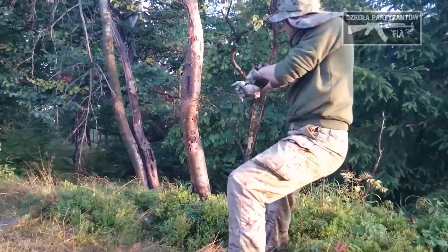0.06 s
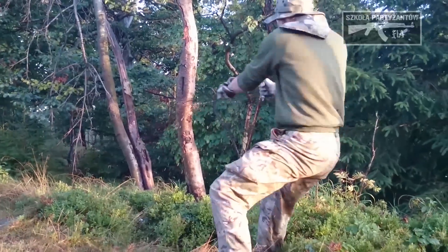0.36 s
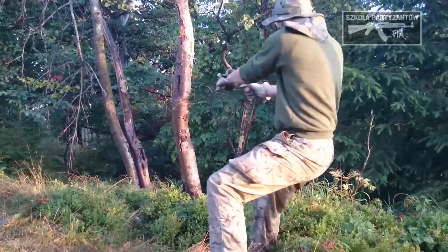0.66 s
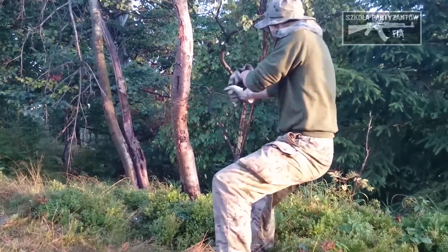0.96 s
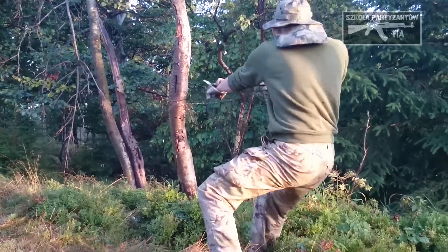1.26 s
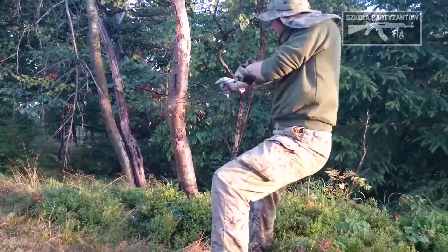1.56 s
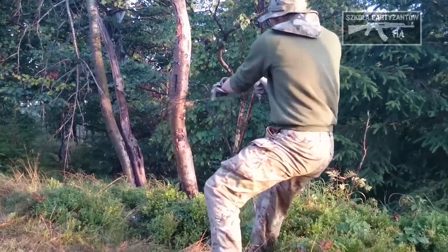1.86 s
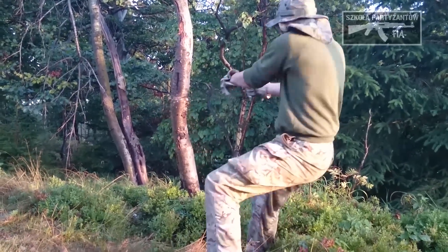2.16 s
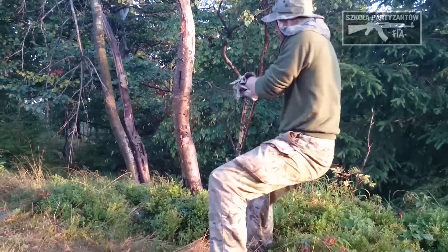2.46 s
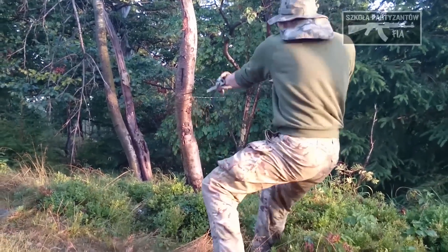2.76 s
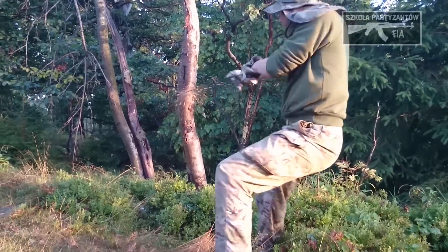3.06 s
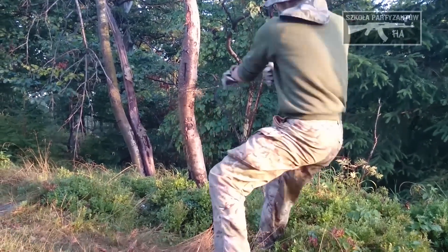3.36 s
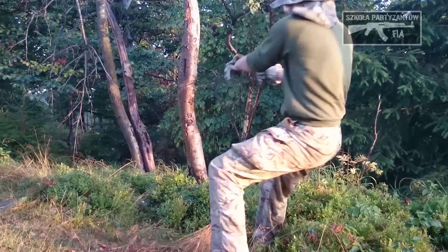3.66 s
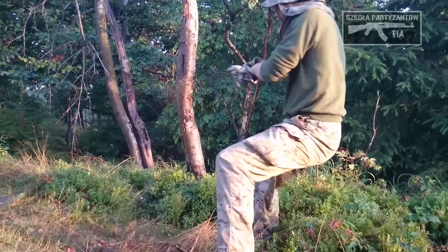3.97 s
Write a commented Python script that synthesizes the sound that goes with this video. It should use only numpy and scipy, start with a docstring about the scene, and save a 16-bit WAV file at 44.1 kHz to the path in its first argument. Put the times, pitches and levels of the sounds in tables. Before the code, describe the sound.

Steady hand sawing through wood outdoors, loud pulls alternating with lighter strokes.

```python
"""A hand saw is worked back and forth through a standing trunk at the edge of a forest.
On each loud pull and lighter push, tooth impacts and stick-slip friction excite the resonances of
trunk and blade; single teeth snag with a tick and a knock, and the trees scatter back a dull tail.
Wind buffets the microphone, mostly in the first half, over a faint forest hush."""
import sys
import numpy as np
from scipy import signal
from scipy.fft import rfft, irfft
from scipy.io import wavfile

SR = 44100
rng = np.random.default_rng(int(sys.argv[2]) if len(sys.argv) > 2 else 0)


def wav_out(sig):
    """Save sig, one row per channel (or a flat mono array), as 16-bit PCM at SR to the path in sys.argv[1]."""
    wavfile.write(sys.argv[1], SR, np.round(np.clip(np.atleast_2d(sig).T, -1, 1) * 32767).astype(np.int16))


N = 176400

# Pulls and pushes in turn; the levels in all tables are relative: (start [s], length [s], peak [dB],
# place of the peak [0-1], swell from ends to peak [dB], wood body [dB], hollow note [dB])
SAW_STROKES = [(-.165, 0.35, -34, 0.53, 34, -1, -14), (0.229, 0.27, -41.5, 0.47, 12.5, 1, 6),
               (0.565, 0.34, -36.5, 0.55, 20, 0.5, 4.5), (0.977, 0.25, -44, 0.42, 9.5, 1.5, 6),
               (1.336, 0.31, -36.5, 0.42, 18.5, -1, 1), (1.729, 0.32, -44.5, 0.28, 9, -1, 2.5),
               (2.061, 0.33, -38.5, 0.49, 14, 2, 5), (2.463, 0.27, -43, 0.27, 8.5, -5, -1.5),
               (2.836, 0.33, -37, 0.56, 18, -1.5, -0.5), (3.206, 0.28, -43.5, 0.41, 11.5, -4.5, 3),
               (3.576, 0.35, -38, 0.39, 16, -2.5, 4), (3.925, 0.35, -45, 0.74, 14.5, 0, -3)]
# Teeth that catch: (time [s], steel tick [dB], knock in the wood [dB])
TOOTH_SNAGS = [(0.0054, -48, -35), (0.02, -45, -39), (0.0336, -30, -51), (0.045, -52, -38),
               (0.2466, -47, -48), (0.2878, -30, -46), (0.3122, -34, -45), (0.3331, -29, -62),
               (0.3684, -31, -42), (0.4076, -29, -50), (0.463, -40, -49), (0.5736, -51, -57),
               (0.7346, -49.5, -34), (0.87, -45, -54), (0.9844, -56, -53.5), (1.0899, -35.5, -53),
               (1.1343, -30.5, -62), (1.1816, -32, -65), (1.3444, -51, -54), (1.364, -40, -43),
               (1.483, -38, -43), (1.5104, -51, -37), (1.7627, -42, -50), (1.802, -44, -48),
               (1.942, -34, -64), (2.0759, -37.5, -59), (2.1179, -32.5, -45), (2.149, -24, -33),
               (2.1794, -37, -41), (2.2423, -56.5, -37), (2.373, -56, -46), (2.4706, -26.5, -47),
               (2.5067, -30.5, -52), (2.5529, -32.5, -65), (2.5909, -27.5, -48), (2.6756, -33, -56),
               (2.7059, -38, -69), (2.8433, -53, -48), (2.998, -35, -36.5), (3.011, -39, -37),
               (3.0502, -34, -33.5), (3.1271, -34, -39), (3.2202, -40, -49), (3.3077, -32.5, -60),
               (3.3478, -33, -42), (3.4431, -41, -50), (3.4972, -46, -70), (3.5842, -39.5, -42.5),
               (3.6127, -51, -35), (3.633, -44, -44), (3.6904, -40, -38.5), (3.7108, -45, -39),
               (3.7927, -40, -35.5), (3.815, -40, -40), (3.862, -34.5, -38)]
# Resonances of trunk and blade: (frequency [Hz], width [Hz], lift [dB])
RESONANCES = [(437, 41, 6.5), (512.5, 23, 7.5), (660, 17, 4.5), (930, 62, 8), (1313, 37, 4),
              (1794, 31, 2.5), (1955, 110, 3.5), (2170, 79, 2), (2266, 78, 1), (2655, 54, 6),
              (2901, 102, 7.5), (3497, 85, 2), (3980, 73, 6.5), (6180, 350, 6.5), (6790, 170, 3)]
# Spectra of wood body, cut, steel, snags, wind and forest: (frequency [Hz], level [dB])
BODY_SPECTRUM = [(100, -39), (230, -15.5), (350, -0.5), (520, 3), (650, -8), (950, -13), (1300, -20),
                 (2500, -30), (8000, -60)]
RASP_SPECTRUM = [(200, -30.5), (550, -12), (1000, -1), (1400, -5.5), (1650, -5), (2100, -1), (2900, -2),
                 (3400, -6.5), (4500, -11.5), (6300, -11.5), (9000, -20), (16000, -31)]
HISS_SPECTRUM = [(500, -29), (2500, 0.5), (4500, -0.5), (6500, 2), (8500, -0.5), (12500, -3), (14000, -4),
                 (15500, 3), (17000, 2.5)]
TICK_SPECTRUM = [(500, 10), (3000, -22), (6300, -1), (9000, -3.5), (13000, -4), (15500, 2), (17000, -1.5)]
KNOCK_SPECTRUM = [(150, -18), (400, -6), (650, 2.5), (1100, -19), (1550, -10.5), (1950, 1.5), (3000, 3),
                  (4500, -9.5), (6500, -12), (12000, -33)]
WIND_SPECTRUM = [(10, -14), (30, -27), (45, -5.5), (60, 2), (90, -3), (130, -11.5), (200, -20),
                 (350, -35.5), (1000, -56)]
HUSH_SPECTRUM = [(20, -24), (70, 6.5), (150, -13), (300, 11), (650, -2), (950, 5), (1500, -3), (3000, -5),
                 (4500, -12), (6500, -6), (10000, -19), (16000, -24)]
# Wind strength at the microphone: (time [s], level [dB])
WIND_GUSTS = [(0.0, -34), (0.02, -48), (0.08, -27.5), (0.18, -50.5), (0.34, -39), (0.39, -60),
              (0.44, -33.5), (0.5, -63), (0.54, -48.5), (0.98, -49.5), (1.02, -58.5), (1.12, -40.5),
              (1.16, -54), (1.31, -45.5), (1.38, -55.5), (1.41, -43.5), (1.53, -40.5), (1.56, -55),
              (1.94, -46), (1.97, -57), (2.07, -41), (2.12, -67), (2.14, -41), (2.33, -41.5), (2.41, -53.5),
              (2.53, -53.5), (2.68, -65.5), (3.77, -68.5), (3.82, -58.5), (4.0, -58.5)]
# Stereo widening, sound in opposite phase between left and right: (frequency [Hz], share [ratio])
ANTIPHASE_SHARE = [(100, -0.1), (270, 0.96), (380, 0.9), (500, 1.12), (640, 0.68), (900, 0.7552),
                   (1150, 0.82), (1400, 0.4246), (1900, 0.46), (2300, 0.18), (2900, 0.202), (4500, -0.0567),
                   (9000, 0.0534)]
# Part of the remainder that is delayed on the left: (frequency [Hz], share [ratio])
DELAYED_SHARE = [(1200, 0.017), (3000, 0.24), (6000, 0.5), (15000, 0.55)]
# Level difference between the channels: (frequency [Hz], left minus right [dB])
LEFT_BALANCE = [(300, -1), (650, -2.5), (1250, 1), (1400, -8), (1700, 3.5), (2050, 5.5), (2400, 2),
                (2650, 3), (3100, -0.5), (3800, 1), (4900, 1.5), (6000, -10), (7600, -1), (8500, -4.5),
                (10000, 0.5), (13000, -2), (14300, 7), (15500, 18)]

TAPS = 4096
HZ = np.fft.rfftfreq(2 * TAPS, 1 / SR)
T = np.arange(N) / SR


def amp(db):
    """Amplitude ratio of a level in decibels."""
    return 10 ** (np.asarray(db) / 20)


def unit(x):
    """Normalisation to rms 1."""
    return x / np.sqrt(np.mean(x ** 2) + 1e-20)


def curve(points):
    """Interpolation of a table on a logarithmic frequency axis."""
    hz, value = np.transpose(points)
    return np.interp(np.log(HZ + 1), np.log(np.sort(hz) + 1), value)


def colour(x, db):
    """Minimum-phase filtering by a dB curve, conserving the power of white noise."""
    cepstrum = irfft(np.log(unit(amp(db)) + 1e-6))
    cepstrum[1:TAPS] *= 2
    cepstrum[TAPS + 1:] = 0
    impulse = irfft(np.exp(rfft(cepstrum)))[None, :TAPS]
    return signal.oaconvolve(x, impulse, axes=1)[:, :x.shape[1]]


def noise():
    """Two uncorrelated white noises."""
    return rng.standard_normal((2, N))


def arm_strokes(bite_s=0.01, lift_s=0.026, full_db=-36, hollow_fade_db=8.5, body_lag_s=0.024):
    """Amplitude modulation: blade speed and the drives on cut, wood and hollow note rise and fall."""
    speed, effort, wood, hollow = np.zeros((4, N))
    for start, length, db, peak, swell_db, wood_db, hollow_db in SAW_STROKES:
        on = (T > start) & (T < start + length)
        t = T[on] - start
        arch = np.sin(np.pi * np.interp(t / length, [0, peak, 1], [0, .5, 1]))
        contact = np.clip(t / bite_s, 0, 1) * np.clip((length - t) / lift_s, 0, 1)
        force = contact * amp(db - full_db - swell_db * (1 - arch))
        speed[on] += arch
        effort[on] += force
        wood[on] += amp(wood_db) * force ** 1.38  # the wood body grows faster than the force
        hollow[on] += amp(hollow_db - hollow_fade_db * t / length) * force
    return speed, effort, np.interp(T - body_lag_s, T, wood), hollow


def tooth_impacts(speed, peak_per_s=900, slowest_share=0.34, decay_s=0.0012, spread_db=2.5):
    """Shot noise: each tooth tears a brief burst, more often at speed, over steady rubbing."""
    bites = rng.random(N) < peak_per_s * (slowest_share + (1 - slowest_share) * speed) / SR
    size = amp(spread_db * np.clip(rng.standard_normal(N), -2, 2))
    bursts = signal.lfilter([1], [1, -np.exp(-1 / (decay_s * SR))], bites * size)
    return unit(np.hypot(1, unit(bursts)))  # rubbing and bursts have equal power


def stick_slip(slips_per_s=60, decay_s=0.0032, jump=0.81):
    """Stick-slip friction: at each random slip of the blade the amplitude jumps, then relaxes."""
    last_slip = np.maximum.accumulate(np.where(rng.random(N) < slips_per_s / SR, T, -1))
    return unit(1 + jump * np.exp((last_slip - T) / decay_s))


def resonance_db():
    """Resonance: each mode of trunk and blade raises a peak in the spectrum of the cut."""
    return sum(db / (1 + (2 * (HZ - hz) / width) ** 2) for hz, width, db in RESONANCES)


def sawing(hollow_hz=643.5, half_width_hz=40):
    """Forced vibration: tearing fibres drive wood body, rasp, steel hiss and the trunk's hollow note."""
    speed, effort, wood, hollow = arm_strokes()
    lift = resonance_db()
    hollow_spectrum = -20 * np.log10(1 + ((HZ - hollow_hz) / half_width_hz) ** 2)
    layers = [(wood, curve(BODY_SPECTRUM) + lift, -37),
              (effort ** 1.034, curve(RASP_SPECTRUM) + lift, -39),
              (effort ** 0.55, curve(HISS_SPECTRUM) + lift, -44.5),
              (hollow, hollow_spectrum, -47.5)]
    return sum(amp(gain_db) * colour(noise() * tooth_impacts(speed) * stick_slip() * drive, spectrum)
               for drive, spectrum, gain_db in layers)


def forest_tail(sound, gain_db=-15.5, t60_s=0.38, cutoff_hz=5000):
    """Reverberation: trunks and foliage scatter back a faint, dull tail."""
    t = T[:SR // 2]
    echoes = rng.standard_normal((2, len(t))) * amp(-60 * t / t60_s)
    tail = colour(echoes, -10 * np.log10(1 + (HZ / cutoff_hz) ** 2))
    tail /= np.linalg.norm(tail[0])
    return amp(gain_db) * signal.fftconvolve(sound, tail, axes=1)[:, :N]


def forest_hush(level_db=-60.5):
    """Stationary noise: the faint, even background of the forest."""
    return amp(level_db) * colour(noise(), curve(HUSH_SPECTRUM))


def flutter(top_hz):
    """Random fluctuation of rms near 1, strongest somewhat below top_hz."""
    ratio = np.fft.rfftfreq(N, 1 / SR) / top_hz
    spectrum = rfft(rng.standard_normal(N)) * ratio / (1 + ratio ** 2) ** 2
    return np.clip(unit(irfft(spectrum, N)), -2, 2)


def wind(gain_db=2, flutter_db=4.7, flutter_hz=25):
    """Turbulence: low, uneven pressure fluctuations buffet the microphone, unlike in each channel."""
    buffets = amp(flutter_db * np.array([flutter(flutter_hz), flutter(flutter_hz)]))
    gusts = amp(gain_db + np.interp(T, *np.transpose(WIND_GUSTS)))
    return gusts * unit(colour(noise() * buffets, curve(WIND_SPECTRUM)))


def snags(rise_s=0.0005, tick_decay_s=0.0019, knock_decay_s=0.0052, tick_gain_db=1, knock_gain_db=4):
    """Impulsive excitation: a tooth catches and breaks free with a bright tick and a longer knock."""
    tick, knock = np.zeros((2, N))
    for start, tick_db, knock_db in TOOTH_SNAGS:
        at = round(start * SR)
        t = T[:min(SR // 10, N - at)]
        onset = np.minimum(t / rise_s, 1)
        tick[at:at + len(t)] += amp(tick_db) * onset * np.exp(-t / tick_decay_s)
        knock[at:at + len(t)] += amp(knock_db) * onset * np.exp(-t / knock_decay_s)
    lift = resonance_db()
    steel = amp(tick_gain_db) * colour(noise() * tick, curve(TICK_SPECTRUM) + lift)
    wood = amp(knock_gain_db) * colour(noise() * knock, curve(KNOCK_SPECTRUM) + lift)
    return steel + wood


def widen_stereo(field, lag_s=0.001315):
    """Stereo widening: low notes in opposite phase between left and right, treble later on the left."""
    def through(sound, response):
        """Linear filtering by a complex frequency response."""
        return signal.oaconvolve(sound, np.roll(irfft(response), TAPS))[TAPS:TAPS + N]
    direct, diffuse = field
    opposed = np.clip(curve(ANTIPHASE_SHARE), -1, 1)
    delayed = curve(DELAYED_SHARE)
    balance = amp(curve(LEFT_BALANCE))
    right_gain = np.sqrt(2 / (1 + balance ** 2))
    left_gain = right_gain * balance
    remainder = np.sqrt(1 - opposed ** 2)
    coherent = remainder * delayed * np.exp(-2j * np.pi * HZ * lag_s) - opposed
    incoherent = remainder * np.sqrt(1 - delayed ** 2)
    left = through(direct, left_gain * coherent) + through(diffuse, left_gain * incoherent)
    return np.array([left, through(direct, right_gain)])


def scene():
    """Superposition of the saw, its reverberation, the forest hush and the wind."""
    saw = sawing() + snags()
    hush = forest_hush()
    return widen_stereo(saw + forest_tail(saw) + hush) + wind()


def record(dry):
    """Band limiting: a linear-phase low-pass removes the highest treble."""
    lowpass = signal.firwin(401, 15950, window=("kaiser", 8), fs=SR)
    return signal.oaconvolve(dry, lowpass[None], "same")


dry = scene()
out = record(dry)
wav_out(out)
```